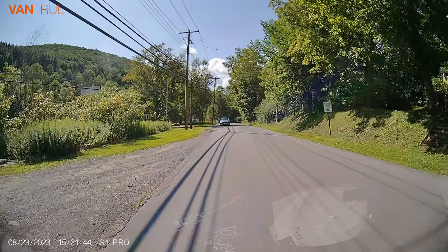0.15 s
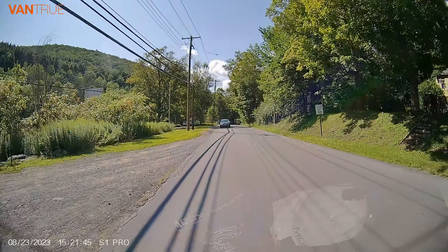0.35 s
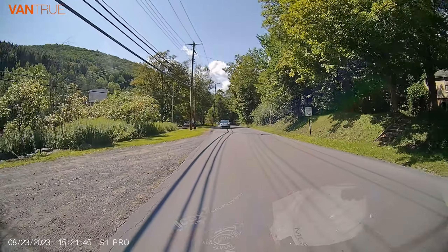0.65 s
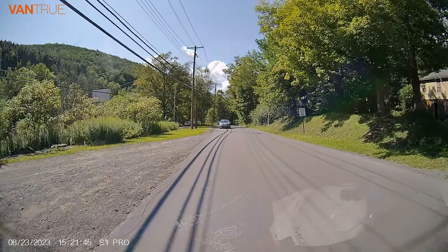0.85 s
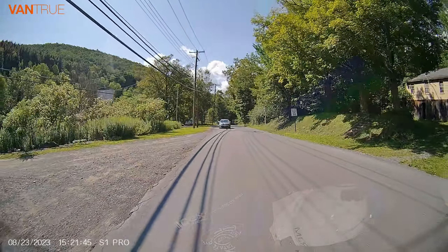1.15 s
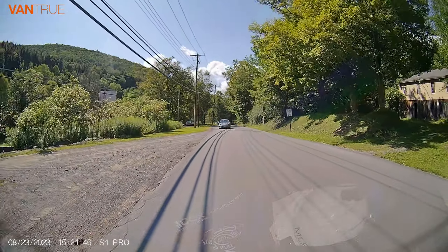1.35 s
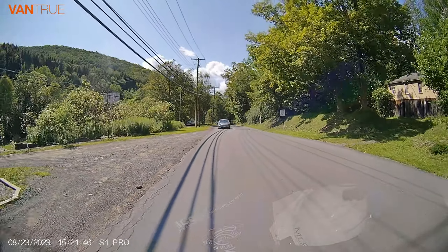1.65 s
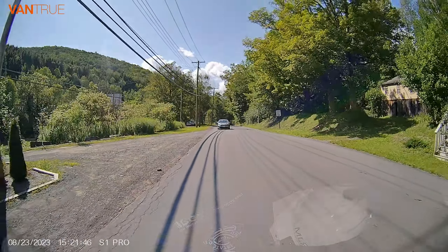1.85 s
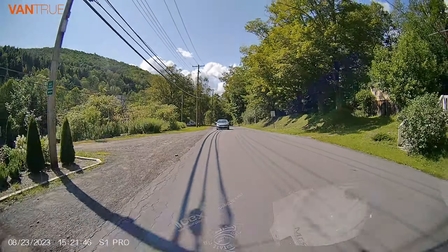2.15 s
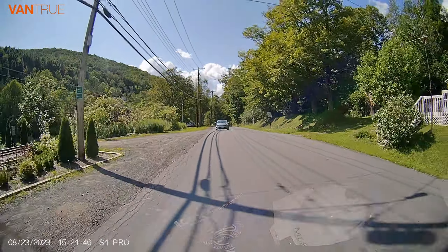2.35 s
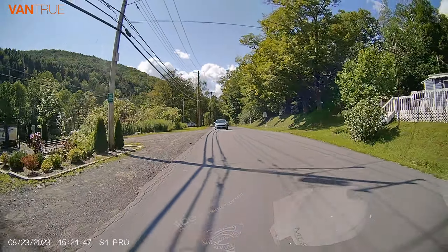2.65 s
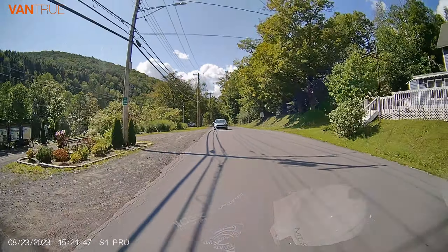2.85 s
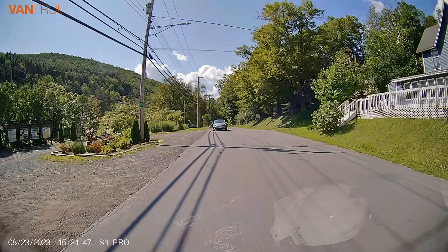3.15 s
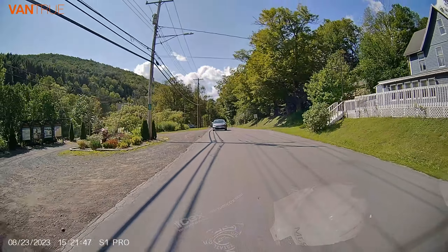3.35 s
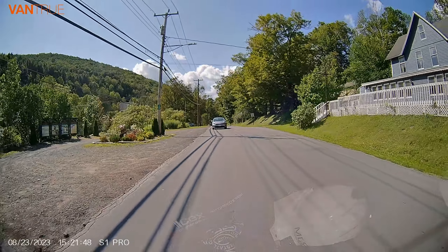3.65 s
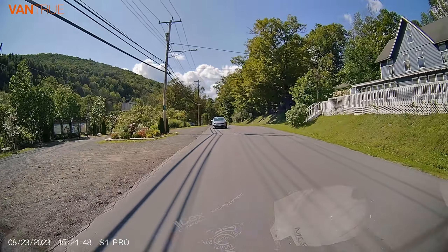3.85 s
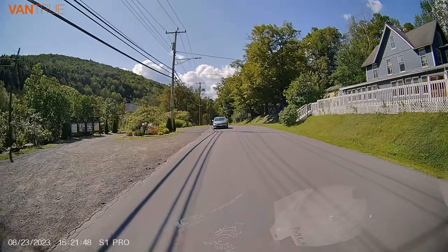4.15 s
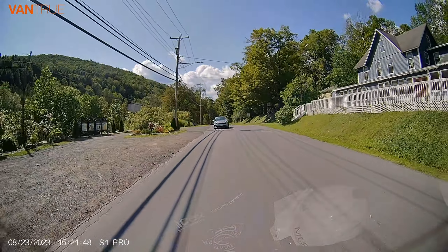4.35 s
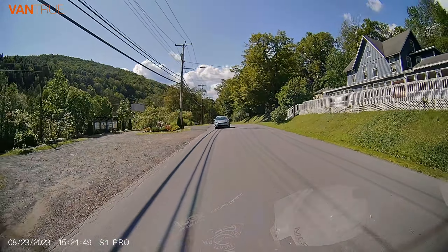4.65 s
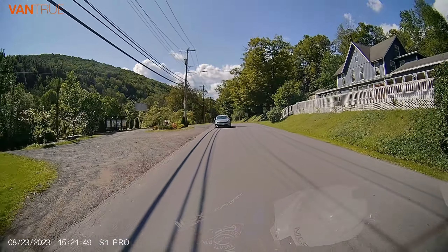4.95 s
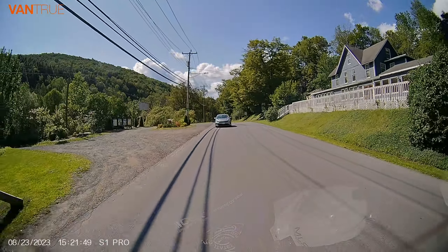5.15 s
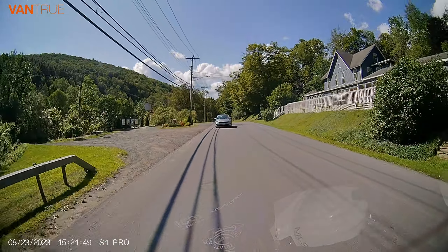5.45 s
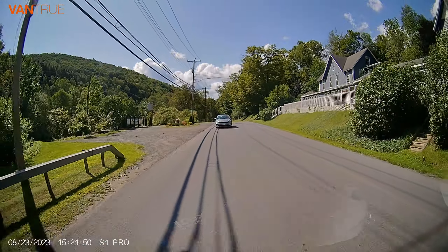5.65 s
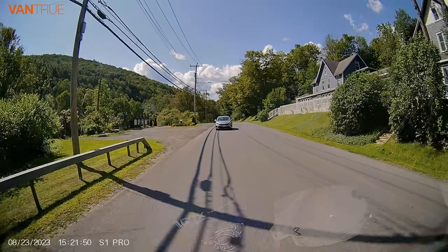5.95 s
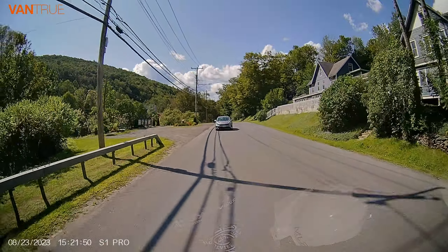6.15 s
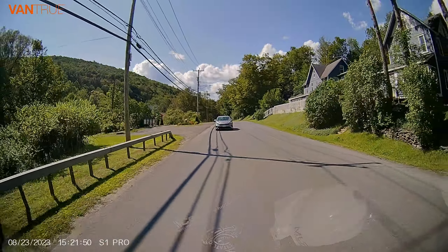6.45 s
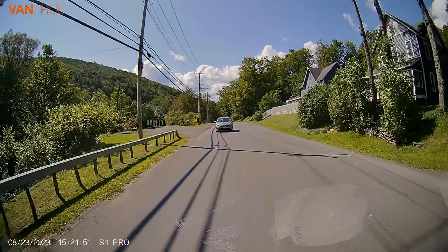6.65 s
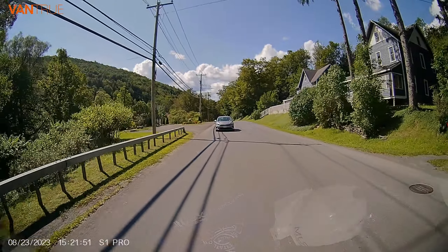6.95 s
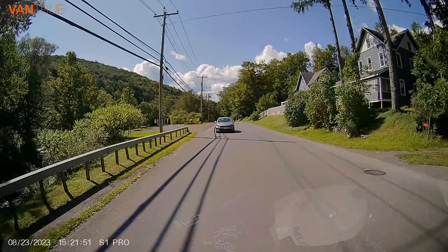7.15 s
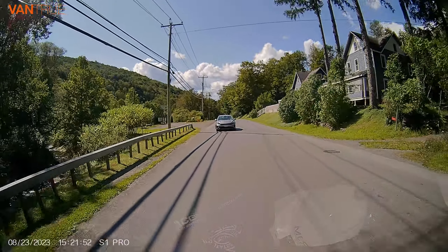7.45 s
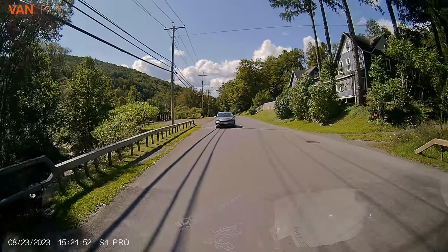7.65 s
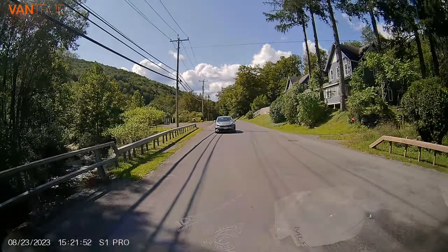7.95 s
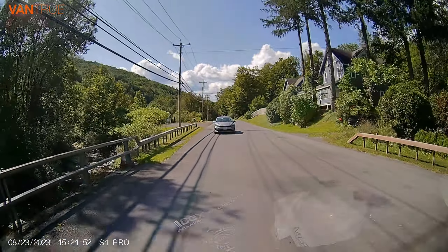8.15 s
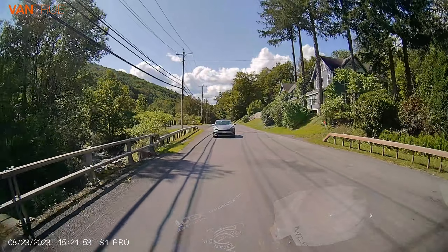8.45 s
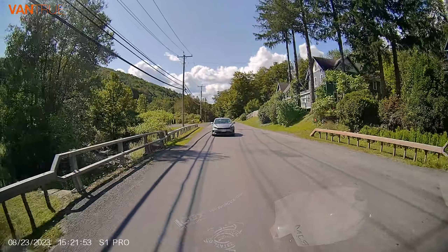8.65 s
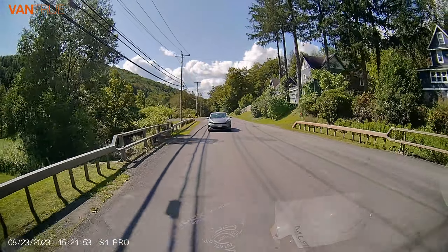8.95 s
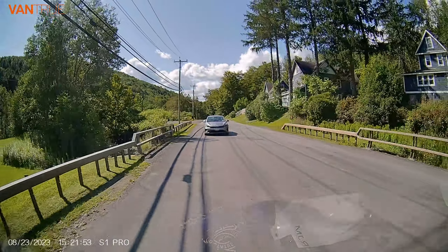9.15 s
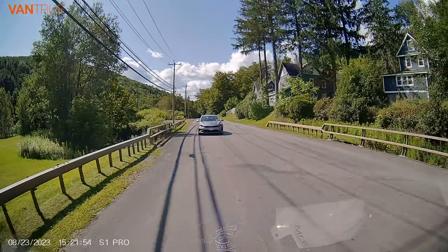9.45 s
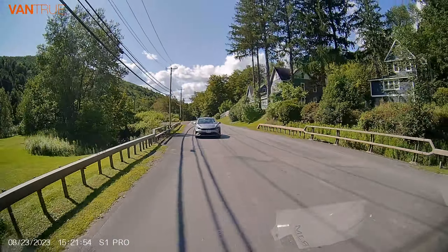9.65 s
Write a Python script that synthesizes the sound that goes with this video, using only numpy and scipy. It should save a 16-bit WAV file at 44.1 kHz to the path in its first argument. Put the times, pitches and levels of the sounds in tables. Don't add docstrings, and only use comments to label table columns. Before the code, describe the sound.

Heard inside a moving car through one small, dull microphone, left channel only. A four-cylinder engine pulls steadily higher over deep road rumble and faint air hiss, with light plastic ticks. At about four and a half seconds a hard knock lands, the pedal is released and the engine sinks away. Then a rough bridge brings dense thumps, knocks and rattles, easing into quiet coasting.

```python
import sys
import numpy as np
from scipy import signal
from scipy.io import wavfile
from scipy.ndimage import uniform_filter1d

SR = 44100
rng = np.random.default_rng(int(sys.argv[2]) if len(sys.argv) > 2 else 0)


def put_to_file(sound):
    columns = np.atleast_2d(sound).T
    safe = np.clip(columns, -1, 1)
    whole_steps = np.round(safe * 32767)
    wavfile.write(sys.argv[1], SR, whole_steps.astype(np.int16))


N = 432621


def undb(db):
    return 10 ** (np.asarray(db) / 20)


def rms_one(x):
    return x / np.sqrt(np.mean(x ** 2) + 1e-20)


def in_time(points, step=1):
    s, values = np.transpose(points)
    return np.interp(np.arange(0, N, step) / SR, s, values)


def at_hz(points, hz):
    pitches, levels = np.transpose(points)
    return np.interp(np.log(hz), np.log(pitches), levels)


def band_pass(x, low_hz, high_hz, order=2):
    return signal.sosfilt(signal.butter(order, [low_hz, high_hz], "band", fs=SR, output="sos"), x)


def low_pass(x, hz, order=2):
    return signal.sosfilt(signal.butter(order, hz, fs=SR, output="sos"), x)


def cut_above(x, hz):
    return signal.sosfilt(signal.ellip(10, .5, 60, hz, fs=SR, output="sos"), x)


def drift(rate):
    r = np.exp(-128 * np.pi * rate / SR)
    coarse = rng.standard_normal(N // 64 + 1002)
    slow = signal.lfilter([1], [1, -2 * r, r * r], coarse)[1000:]
    return np.interp(np.arange(N) / 64, np.arange(len(slow)), rms_one(slow))


def ring(clicks, hz, t60):
    r = undb(-60 / (max(t60, .004) * SR))
    w = 2 * np.pi * hz / SR
    return signal.lfilter([0, np.sin(w)], [1, -2 * r * np.cos(w), r * r], clicks + 1e-18)


def add(out, s, sound):
    i = max(round(s * SR), 0)
    out[i:i + len(sound)] += sound[:N - i]


def noise_bands(spectrum, low_hz, high_hz, patchy_db):
    count = max(round(3 * np.log2(high_hz / low_hz)), 1)
    edges = np.geomspace(low_hz, high_hz, count + 1)
    white = rng.standard_normal((2, N))
    together, out = drift(6.4), 0
    for k, (low, high) in enumerate(zip(edges, edges[1:])):
        flicker_db = patchy_db * (2.0 * together + drift(6.8))
        level_db = at_hz(spectrum, np.sqrt(low * high)) + flicker_db
        out = out + band_pass(white[k % 2], low, high) * undb(level_db)
    return rms_one(out)


LIFT_OFF_S = 4.6


def coasting(step=1):
    return np.clip((np.arange(0, N, step) / SR - LIFT_OFF_S) / .3, 0, 1)


# (pitch [Hz], width
# [Hz], level [dB])
CABIN_RESONANCES = [(84, 4.4, 4.5), (171, 48, 9.5), (246, 29, 5.5), (299, 45, 7.5), (237, 12, -5.5),
                    (278, 12, -8.5), (600, 30, 6), (816, 34, 10), (960, 90, 10), (1244, 23, 7),
                    (1263, 30, 6.5), (1402, 28, 12.5), (1545, 68, 15), (1918, 53, 9)]


def resonance_db(hz):
    return sum(db / (1 + (2 * (hz - centre) / width) ** 2) for centre, width, db in CABIN_RESONANCES)


# (pitch [Hz], level [dB])
FIREWALL = [(15, -10.5), (60, -23), (150, -16.5), (300, -14), (500, -15.5), (900, -33.5), (1500, -29),
            (1620, -40), (1700, -45), (2300, -41)]


def cabin_db(hz):
    return at_hz(FIREWALL, hz) + resonance_db(hz)


# (time [s], level [dB])
ENGINE_LOAD = [(0, -57.5), (.7, -53), (1, -54.5), (1.5, -52.5), (2, -53), (2.7, -49.5), (3.1, -50.5),
               (3.5, -49), (4.5, -47.5), (4.75, -54.5), (5.8, -66.5), (6.3, -94), (9.81, -89)]
WHINE_ORDER, WHINE_DB, WHINE_DB_PER_HZ, WHINE_COASTING_DB, WHINE_DIES_HZ = 32, -81, .9, -4, 62


def pump_whine(firing_hz, phase, off, wander):
    speed_up_hz = np.maximum.accumulate(firing_hz) - ENGINE_SPEED[0][1]
    level_db = WHINE_DB + WHINE_DB_PER_HZ * speed_up_hz + WHINE_COASTING_DB * off
    level_db = level_db - 5.1 * np.maximum(WHINE_DIES_HZ - firing_hz, 0) - 4.5 + 2.5 * wander
    return undb(level_db) * np.sin(WHINE_ORDER * phase)


# (pitch [Hz], level [dB])
CABIN_BOOM = [(55, -82), (62, -46), (70, -74.5), (74, -46.5), (79, -46), (84, -37.5), (88.5, -56),
              (92, -53.5)]
# (pitch [Hz], level [dB])
EXHAUST_DRONE = [(140, -72), (150, -54.5), (160, -60), (163, -47.5), (172, -50.5), (178, -43.5), (184, -56)]
BOOM_COASTING_DB, DRONE_COASTING_DB = -4, -15.0


def boom_and_drone(firing_hz, phase, off):
    boom_db = at_hz(CABIN_BOOM, firing_hz) + 3.0 + BOOM_COASTING_DB * off
    drone_db = at_hz(EXHAUST_DRONE, 2 * firing_hz) + 3.0 + DRONE_COASTING_DB * off
    return undb(boom_db) * np.sin(4 * phase) + undb(drone_db) * np.sin(8 * phase)


# (time [s], firing rate [Hz])
ENGINE_SPEED = [(0, 67.0), (1, 72.5), (2, 78.4), (3, 84.1), (3.8, 89.0), (4.4, 91.3), (4.75, 91.8),
                (5.0, 86.3), (5.2, 81.0), (5.45, 75.0), (5.75, 62.0), (6.6, 55.0), (9.81, 55.0)]
ORDER_OFFSETS = {1: -11.5, 2: -9, 3: -8, 4: -16, 5: -15.5, 6: -7, 7: -0.5, 8: -8.5, 10: 2.8, 11: 1.6, 12:
                 0.82, 14: 3, 16: -4.5, 20: -1.8, 24: -2.5, 26: -2.5, 28: 1.4, 40: -5.5, 42: -2.1}
VALVE_ORDERS = {76: 0, 84: -5, 88: 4, 92: 5, 104: 5}
# (pitch [Hz], level [dB])
DASH_WHISTLE = [(1485, -90), (1508, -72), (1548, -66), (1557, -66), (1563, -90)]
WHISTLING_ORDERS = {70: -4, 72: -2, 76: 0, 84: -5, 88: -2}
ORDER_SWELLS = {11: [(4.4, -10)], 15: [(2.8, 6)], 16: [(.35, 12), (1.3, 11.5), (3.2, 9)], 18: [(1.1, 3)],
                19: [(2.1, 11.5), (3.95, 6.5)], 57: [(4.55, 7)], 58: [(4.5, 10.5)], 62: [(1.8, 10),
                (3.1, 7)], 66: [(2.2, 7.5)], 68: [(2.3, 8)], 70: [(3.8, 0)], 74: [(2.75, 6.5)],
                76: [(2.4, 5)], 88: [(.6, 5), (3.5, 5)], 92: [(2.85, 4), (3.6, -10)], 104: [(1.1, 5)]}
SWELL_S = .22
ODD_DB, EVEN_DB, FIRING_DB = -3, -0.5, 2
CLATTER_FROM_ORDER, CLATTER_DB, CLATTER_COASTING_DB = 50, -3, 8
SING_FROM_DB, SING_FULL_DB = 5, 11
CRANK_WOBBLE_RAD = .010


def engine(waver_db):
    step, slow = 6, 32
    size = round(6.6 * SR) // step
    firing_hz = in_time(ENGINE_SPEED, step)[:size]
    off = coasting(step)[:size]
    cycle_hz = firing_hz / 4
    phase = 2 * np.pi * np.cumsum(cycle_hz) * step / SR
    whine_wander = drift(4)[:size * step:step]
    phase = phase + CRANK_WOBBLE_RAD * drift(6)[:size * step:step]
    out = pump_whine(firing_hz, phase, off, whine_wander) + boom_and_drone(firing_hz, phase, off)

    slow_at = np.arange(0, size, slow)
    t, off = slow_at * step / SR, off[::slow]
    load_db = in_time(ENGINE_LOAD, step)[:size:slow]
    clatter_db = load_db + CLATTER_DB + CLATTER_COASTING_DB * off
    for k in range(1, 105):
        hz = k * cycle_hz[::slow]
        uneven = np.interp(slow_at, np.linspace(0, size, 30), rng.standard_normal(30))
        sings = np.clip((resonance_db(hz) - SING_FROM_DB) / (SING_FULL_DB - SING_FROM_DB), 0, 1)
        family_db = ODD_DB if k % 2 else EVEN_DB if k % 4 else FIRING_DB
        valve_db = VALVE_ORDERS.get(k, 0) * (1 - off) * sings
        drive_db = load_db if k < CLATTER_FROM_ORDER else clatter_db
        order_db = ORDER_OFFSETS.get(k, 0) + valve_db + family_db
        level_db = drive_db + cabin_db(hz) + order_db + waver_db * uneven
        whistle_db = at_hz(DASH_WHISTLE, hz) + WHISTLING_ORDERS.get(k, -60) - 3.0 - 20 * off
        swell_db = sum(db * np.exp(-((t - s) / SWELL_S) ** 2) for s, db in ORDER_SWELLS.get(k, []))
        gain = (undb(level_db) + undb(whistle_db)) * undb(swell_db)
        tone = np.sin(k * phase + rng.uniform(0, 2 * np.pi))
        out = out + np.repeat(gain, slow)[:size] * tone
    full = np.zeros(N)
    full[:size * step] = signal.resample_poly(out, step, 1)
    return full


# (pitch [Hz], level [dB per Hz])
HISS_COLOUR = [(1500, 5.5), (1800, 4.5), (2300, -2), (2600, -1), (3500, -4), (3900, -5.5), (5000, -6.5),
               (7500, -9), (9000, -12.5)]
HISS_DB = -76.5


def air_hiss():
    hiss = undb(HISS_DB) * noise_bands(HISS_COLOUR, 1445, 9000, patchy_db=.15)
    intake = band_pass(hiss, 2300, 3900)
    return hiss + undb(in_time(ENGINE_LOAD) + 41) * intake


# (time [s], level [dB])
ROAD_SHAKE = [(0.0, -43), (0.11, -56), (1.61, -46.5), (5.03, -53.5), (5.08, -52), (5.19, -47),
              (7.07, -53.5), (7.21, -44), (7.38, -51), (7.49, -30.5), (7.76, -37.5), (8.8, -34.5),
              (8.83, -36.5), (8.88, -40.5), (9.21, -40.5), (9.26, -47.5), (9.45, -43), (9.81, -49.5)]
ROAD_EDGES_HZ = (55, 130, 500, 1650)
# (pitch [Hz], level [dB per Hz])
ROAD_COLOUR = [(11, -32), (18, 1.5), (43, 10), (65, -3.5), (98, 0.5), (129, -17), (199, -16.5), (233, -20),
               (263, -20), (320, -19), (422, -33.5), (465, -25), (494, -29), (534, -28), (2000, -41.5),
               (2600, -74), (4400, -120)]
SMOOTH_DB = -50
TYRE_BOOM_DB, TYRE_BOOM_FOLLOWS, TYRE_BOOM_LINGERS_S, TYRE_BOOM_KICK_DB = -49, 0.3, 0.037, -20.5
RUMBLE_DB, RUMBLE_FOLLOWS, RUMBLE_KICK_DB = -52.5, 0.11, -2.5
ROAR_DB, ROAR_FOLLOWS, ROAR_GAIN_DB_PER_S, ROAR_LOSS_DB_PER_S = -62, 0.24, 0.8, 0.73


def road():
    shake_db, t = in_time(ROAD_SHAKE), np.arange(N) / SR
    rough_db = shake_db - SMOOTH_DB
    s, db, *_ = np.transpose(WHEEL_BUMPS)
    blows = np.bincount((s * SR).astype(int), undb(db + TYRE_BOOM_KICK_DB), N)
    kicks = signal.lfilter([1], [1, -np.exp(-1 / (TYRE_BOOM_LINGERS_S * SR))], blows + 1e-18)
    kicks = uniform_filter1d(kicks, size=900)
    before_s, after_s = np.maximum(LIFT_OFF_S - t, 0), np.maximum(t - LIFT_OFF_S, 0)
    slow_db = ROAR_GAIN_DB_PER_S * before_s + ROAR_LOSS_DB_PER_S * after_s

    a, b, c, d = ROAD_EDGES_HZ
    body = rms_one(ring(rng.standard_normal(N), 30.5, .55))
    shake = undb(shake_db) * rms_one(noise_bands(ROAD_COLOUR, 21, a, patchy_db=2.5) + 1.7 * body)
    boom_gain = undb(TYRE_BOOM_DB + TYRE_BOOM_FOLLOWS * rough_db) + kicks
    boom = boom_gain * noise_bands(ROAD_COLOUR, a, b, patchy_db=-1.8)
    rumble_gain = undb(RUMBLE_DB + RUMBLE_FOLLOWS * rough_db) + undb(RUMBLE_KICK_DB) * kicks
    rumble = rumble_gain * noise_bands(ROAD_COLOUR, b, c, patchy_db=.9)
    roar_gain = undb(ROAR_DB + ROAR_FOLLOWS * rough_db - slow_db)
    roar = roar_gain * cut_above(noise_bands(ROAD_COLOUR, c, d, patchy_db=.9), d)
    return shake + boom + rumble + roar


# (time [s], level [dB], pitch [Hz], length [s])
PANEL_BUZZES = [(3.9, -65.5, 1290, 0.132), (4.562, -62, 1400, 0.14), (4.563, -62, 1035, 0.067),
                (7.487, -64.5, 1500, 0.063), (7.505, -73, 2140, 0.03), (7.555, -74, 2300, 0.013),
                (7.515, -80, 3600, 0.024), (9.2, -61, 950, 0.021), (8.495, -66, 2850, 0.014),
                (7.8, -60, 1110, .008), (8.66, -57, 820, 0.017), (8.105, -58, 1000, .015),
                (8.15, -58, 850, .025), (8.285, -63, 970, .02), (8.45, -55.5, 1000, .025),
                (8.76, -61, 1030, 0.11), (6.57, -60, 520, .06), (6.57, -70, 1420, .03),
                (3.8, -64, 1100, .05), (8.94, -66, 950, 0.12)]
BUZZ_CYCLES = 29
DOOR_HZ, DOOR_T60_S, DOOR_DB = 322.7, .07, -57.5


def panels():
    hum = rms_one(ring(rng.standard_normal(N), DOOR_HZ, DOOR_T60_S))
    out = undb(DOOR_DB + 1.9 * drift(2.7)) * hum
    t = np.arange(12000) / SR
    for s, db, hz, length in PANEL_BUZZES:
        buzz = rms_one(ring(rng.standard_normal(12000), hz, BUZZ_CYCLES / hz))
        shape = np.clip(t / .006, 0, 1) * np.exp(-np.maximum(t - length, 0) / 0.019)
        add(out, s, undb(db) * shape * buzz)
    return out


# (first touch [s], last touch [s], taps per body swing, peak level [dB])
TAP_RUNS = [(.7452, .7796, 1, -69.5), (1.9629, 2.0018, 1, -65), (2.2822, 2.3937, 1, -64.5),
            (2.491, 2.5272, 1, -64.5), (2.7247, 2.8325, 1, -64), (2.9612, 2.9612, 1, -65),
            (3.7308, 3.7678, 1, -63), (4.0302, 4.0991, 1, -62.5), (4.6064, 4.6064, 1, -67),
            (4.694, 4.7686, 1, -62.5), (5.3926, 5.4271, 1, -65), (6.0866, 6.137, 1, -64),
            (6.1709, 6.1888, 2, -64.5), (7.0958, 7.1467, 2, -62.5), (7.2085, 7.2085, 1, -64),
            (6.6393, 6.657, 2, -62.5), (3.272, 3.307, 1, -65), (7.4001, 7.436, 1, -65.5),
            (7.5677, 7.5677, 1, -64), (7.7243, 7.7243, 1, -64), (7.8356, 7.9708, 1, -64.5),
            (8.0477, 8.0477, 1, -63.5), (8.1743, 8.1743, 1, -61), (8.2985, 8.3539, 1, -63),
            (8.3903, 8.4432, 2, -61.5), (8.6068, 8.679, 1, -60.5), (8.909, 8.93, 2, -59.5),
            (9.0309, 9.0838, 1, -67), (9.208, 9.2993, 1, -63.5), (9.4898, 9.5786, 2, -65)]
SWING_S = .035
TAP_HZ, TAP_SPREAD_HZ, TAP_SPREAD_DB = 3280, 130, 1.5


def taps():
    rows = []
    for first, last, per_swing, db in TAP_RUNS:
        count = round((last - first) * round(per_swing) / SWING_S) + 1
        for s in np.linspace(first, last, count):
            a, b = rng.standard_normal(2)
            rows.append((s, db + TAP_SPREAD_DB * a, TAP_HZ + TAP_SPREAD_HZ * b))
    return rows


# (time [s], peak level [dB], main pitch [Hz])
HARD_TICKS = [(1.4785, -66, 3170), (2.4543, -64, 3080), (2.9274, -57.5, 2820), (3.3997, -62, 2820),
              (3.4915, -63, 3260), (3.6167, -64.5, 3410), (4.155, -60, 2950), (5.5053, -56, 3180),
              (7.045, -63, 3240), (7.4728, -52, 3320), (7.491, -50, 3400), (7.5083, -53.5, 3430),
              (7.5864, -56, 3420), (7.756, -50.5, 2780), (8.0013, -52.5, 2920), (8.0235, -57, 3430),
              (8.116, -59, 3300), (8.2038, -55, 3300), (8.2227, -54.5, 2900), (8.464, -55, 2950),
              (8.483, -55.5, 2830), (8.538, -41, 2900), (8.543, -52, 3500), (8.5643, -48.5, 3260),
              (8.7071, -55, 3170), (8.73, -49, 2890), (8.7675, -52.5, 3350), (9.128, -57, 3420),
              (9.157, -53, 2840), (9.3555, -61, 2930)]
# (pitch [Hz], level [dB], time to fall 60 dB [s])
PLASTIC_MODES = [(2360, -5.5, 0.012), (2980, -14.5, 0.048), (3320, -8, 0.0091), (3300, -9.5, 0.0056)]


def ticks():
    out, click = np.zeros(N), np.zeros(2000)
    click[0], click[90] = 1, -0.046
    soft_start = 1 - np.exp(-np.arange(2000) / SR / .0007)
    for s, db, main_hz in [*HARD_TICKS, *taps()]:
        tick = ring(click, main_hz, 0.0059 + 0.0017 * np.clip(db + 55.0, 0, 9.0))
        for hz, mode_db, t60 in PLASTIC_MODES:
            tick = tick + undb(mode_db + rng.normal(-1.5, 2.0)) * ring(click, hz, t60)
        tick = tick * soft_start
        add(out, s, undb(db - 0.5) * tick / np.abs(tick).max())
    shaken = undb(0.67 * (in_time(ROAD_SHAKE) + 48.0))
    chatter = (rng.random(N) < 12 * shaken / SR) * undb(-71.5 + rng.normal(0, 2.0, N))
    out += ring(chatter, 3350, 0.014) + 0.4 * ring(chatter, 2900, 0.0055)
    return band_pass(out, 2100, 4000, order=3)


# (time [s], level [dB], length [s], centre pitch [Hz])
RUBBING_SCUFFS = [(0.296, -79.5, 0.029, 6000), (0.36, -72, 0.013, 4500), (5.09, -74.5, 0.022, 3970),
                  (5.508, -76, 0.021, 3020), (5.512, -60.5, 0.018, 1280), (6.117, -80, .03, 5040),
                  (6.931, -71, 0.0057, 4020), (7.527, -76.5, 0.072, 2100), (7.501, -73.5, .03, 3380),
                  (7.775, -68.5, 0.016, 3200), (8.487, -67.5, 0.032, 2880), (9.319, -66.5, 0.014, 2830),
                  (4.551, -69, 0.012, 2800), (8.228, -75, 0.008, 5000), (8.743, -57.5, 0.017, 2500),
                  (8.744, -58.5, 0.0054, 5600), (8.575, -75, 0.024, 5360), (8.767, -68.5, 0.017, 3170),
                  (9.132, -73, 0.0084, 5030), (9.16, -76, 0.0072, 5000), (9.728, -77, .012, 4000)]


def scuffs():
    out, t = np.zeros(N), (np.arange(8000) - 4000) / SR
    for s, db, length, hz in RUBBING_SCUFFS:
        white = rng.standard_normal(8000)
        grains = white * (np.abs(white) > 2.4)
        puff = rms_one(band_pass(grains, 0.38 * hz, 1.19 * hz))
        side_s = length * np.where(t < 0, .6, 1.3)
        add(out, s - 4000 / SR, undb(db) * puff * np.exp(-(t / side_s) ** 2))
    return out


# (time [s], peak level [dB], main pitch [Hz], brightness [dB])
TRIM_KNOCKS = [(0.381, -45, 1260, -4), (2.063, -36, 560, -21), (4.536, -26.5, 780, -13.5),
               (5.246, -30, 790, -19), (5.505, -34.5, 670, -22.5), (6.556, -34.5, 532, -15),
               (6.93, -49, 980, 7), (7.185, -36, 670, -43), (7.447, -34.5, 850, -14),
               (7.471, -37, 1340, -8.5), (7.489, -40, 876, 0.5), (7.509, -36, 651, -42),
               (7.608, -48, 830, -12), (7.689, -48, 991, -11), (7.951, -42.5, 1040, -13),
               (8.116, -43.5, 835, -16), (8.147, -35, 500, -14.5), (8.285, -48, 695, -2),
               (8.393, -45.5, 650, -9), (8.411, -32.5, 996, -14.5), (8.493, -34.5, 996, -17),
               (8.539, -36, 680, -11), (8.573, -33, 654, -12.5), (8.646, -39, 840, -13),
               (8.747, -38, 664, -5), (8.936, -36.5, 624, -9), (9.306, -35, 1074, -11.5),
               (9.726, -35, 647, -20)]
# (pitch [Hz], level [dB], time to fall 60 dB [s])
TRIM_MODES = [(197, 0, 0.06), (336.3, -3, 0.2), (404, -17, 0.21), (484, 1, 0.031), (601, -9.5, 0.17),
              (770, -22.5, 0.011), (970, -2.5, 0.023), (1160, 3, 0.0048), (1195, -11, 0.035),
              (1495, -13, 0.021)]
KNOCK_S = .016


def knocks():
    out, size = np.zeros(N), round(.25 * SR)
    t = np.arange(size) / SR
    contacts = (np.array([0, .3, .6, 1]) * KNOCK_S * SR).astype(int)
    for s, db, main_hz, bright_db in TRIM_KNOCKS:
        luck, hit = rng.random(50), 0
        for k, (hz, mode_db, t60) in enumerate([*TRIM_MODES, (main_hz, -3.0, .05)]):
            strength = (0.15 + luck[4 * k:4 + 4 * k]) * [0.7, 0.76, 0.33, 0.21]
            clicks = np.zeros(size)
            clicks[contacts] = strength * np.sign(luck[k:k + 4] - .5)
            tilt_db = (bright_db + 16.5) * np.log2(hz / 500)
            mode = ring(clicks, hz, t60)
            level_db = mode_db + 0.93 * tilt_db + 1.1 * luck[k + 30]
            hit = hit + undb(level_db) * mode / np.abs(mode).max()
        shudder = rms_one(band_pass(rng.standard_normal(size), 200, 900))
        shudder = shudder * (1 - np.exp(-t / 0.0029)) * undb(-60 * t / 0.13)
        hit = hit / np.abs(hit).max() + 0.2 * shudder
        hit = low_pass(hit, 1900 * undb(0.27 * bright_db), order=3) * (1 - np.exp(-t / 0.0025))
        add(out, s, undb(db - 3.5) * hit / np.abs(hit).max())
    return out


def thumps(rows, floor_db, cut_hz=600):
    out, t = np.zeros(N), np.arange(round(.4 * SR)) / SR
    for s, db, hz, t60 in rows:
        floor_hz, turn = 125 + 8.0 * rng.uniform(0, 2 * np.pi), rng.uniform(0, 2 * np.pi)
        shape = (1 - np.exp(-t / 0.003)) ** 2 * undb(-60 * t / max(t60, .03))
        floor = undb(floor_db) * np.sin(2 * np.pi * floor_hz * t + turn)
        body = floor - np.sin(2 * np.pi * hz * t)
        add(out, s, undb(db + 0.5) * shape / shape.max() * body)
    return low_pass(out, cut_hz)


# (time [s], peak level [dB], body pitch [Hz], time to fall 60 dB [s])
WHEEL_BUMPS = [(0.75, -34.5, 104.4, 0.28), (4.506, -43, 94, 0.23), (4.532, -27.5, 196, 0.067),
               (4.557, -35.5, 90.5, 0.35), (5.229, -33, 147, 0.13), (5.248, -35, 75.4, 0.36),
               (5.27, -35, 108, 0.2), (6.415, -37.5, 98, 0.16), (6.872, -35.5, 98, 0.13),
               (6.922, -29, 116, 0.065), (7.155, -38, 101.2, 0.33), (7.188, -29.5, 162, 0.053),
               (7.208, -33, 92, 0.36), (7.426, -35, 122, 0.24), (7.449, -22, 85.3, 0.13),
               (7.468, -31, 161.5, 0.12), (7.501, -35.3, 74, 0.24), (7.535, -42, 154, 0.32),
               (7.562, -37, 104.7, 0.32), (7.629, -32.5, 91.7, 0.41), (7.701, -38, 103, 0.3),
               (7.783, -25.5, 99, 0.048), (7.831, -37, 94.6, 0.26), (7.942, -35, 61.5, 0.2),
               (7.99, -33.5, 180, 0.045), (8.079, -39.5, 124, 0.12), (8.098, -33, 141.7, 0.35),
               (8.127, -18, 111, 0.049), (8.179, -29, 97.6, 0.075), (8.255, -34, 111.6, 0.3),
               (8.28, -24.5, 86, 0.092), (8.338, -48, 71, 0.26), (8.365, -31, 170.2, 0.46),
               (8.384, -23, 77.7, 0.16), (8.41, -23, 117.7, 0.17), (8.436, -30, 66.4, 0.16),
               (8.459, -34, 92.6, 0.079), (8.49, -19, 97.6, 0.067), (8.65, -29, 87.3, 0.34),
               (8.699, -36, 101, 0.058), (8.72, -40, 145.6, 0.29), (8.744, -28.5, 83.5, 0.16),
               (8.765, -33.5, 161, 0.2), (8.801, -34, 101, 0.093)]


def wheel_bumps():
    return thumps(WHEEL_BUMPS, floor_db=-15)


# (time [s], peak level [dB], pitch [Hz], time to fall 60 dB [s])
LOW_THUMPS = [(2.695, -24, 74, 0.13), (4.207, -38, 104.8, 0.56), (4.915, -34, 89.5, 0.16),
              (5.038, -33, 86.5, 0.68), (5.081, -27, 80.7, 0.16), (5.145, -28, 92, 0.22),
              (5.49, -41, 177.4, 0.2), (6.565, -37.5, 206, 0.25), (9.6, -39, 96.8, 0.19),
              (9.74, -38.5, 104.6, 0.23)]


def low_thumps():
    return thumps(LOW_THUMPS, floor_db=-28)


# (time [s], peak level [dB], pitch [Hz], time to fall 60 dB [s])
PANEL_HITS = [(4.5224, -44, 332, 0.08), (4.5329, -28.2, 386, 0.084), (4.5359, -30, 481, 0.046),
              (4.536, -33, 770, 0.066), (4.5386, -46, 1316, 0.035), (4.5394, -51, 985, 0.03),
              (4.5416, -27.5, 544, 0.03), (4.544, -35, 322, 0.08), (4.5459, -41, 610, 0.03),
              (4.5559, -40, 424, 0.03), (4.5657, -41, 370, 0.05), (4.577, -43, 439, 0.05),
              (5.2484, -40.5, 572, 0.08), (5.2508, -47, 740, 0.074), (5.2511, -38, 316, 0.08),
              (5.2576, -39.5, 478, 0.04), (5.2813, -42, 323, 0.15), (6.5927, -33, 285, 0.026),
              (7.1757, -40, 312, 0.09), (7.4508, -29, 251, 0.03), (7.4543, -40.5, 325, 0.14),
              (7.4724, -36, 261, 0.05), (7.511, -40.5, 297, 0.043), (8.1206, -33.5, 250, 0.028),
              (8.123, -47.5, 418, 0.17), (8.1306, -39.6, 285, 0.03), (8.1603, -40, 326, 0.026),
              (8.1816, -39, 341, 0.045), (8.3879, -40.5, 307, 0.072), (8.4017, -43.5, 255, 0.13),
              (8.411, -40, 387, 0.041), (8.4138, -45.7, 936, 0.033), (8.4163, -50.5, 655, 0.13),
              (8.484, -37.5, 280, 0.03), (8.4903, -47, 660, 0.08), (8.4921, -39, 388, 0.034),
              (8.4937, -40.5, 247, 0.13), (8.5438, -40.9, 270, 0.025), (8.5734, -53, 990, 0.018),
              (8.5724, -42, 500, 0.03), (8.937, -41, 499, 0.026), (9.3057, -45.5, 650, 0.041),
              (9.3073, -43.5, 458, 0.034), (9.3097, -50, 983, 0.06)]


def panel_hits():
    return thumps(PANEL_HITS, floor_db=-60, cut_hz=4000)


def scene():
    cabin = engine(waver_db=3.0) + air_hiss() + road() + panels() + ticks()
    cabin += scuffs() + knocks() + wheel_bumps() + low_thumps() + panel_hits()
    return np.stack([2 * cabin, np.zeros(N)])


# (start time [s], end time [s])
STARVED_MOMENTS = [(4.495, 4.555), (6.543, 6.605), (7.440, 7.499), (8.271, 8.395), (8.911, 8.971),
                   (9.295, 9.355)]
STARVED_ABOVE_HZ, CUTOFF_HZ = 4500, 7620


def record(dry):
    wide, narrow = cut_above(dry, CUTOFF_HZ), cut_above(dry, STARVED_ABOVE_HZ)
    t = np.arange(N) / SR
    starved = sum(1. * ((t > a) & (t < b)) for a, b in STARVED_MOMENTS)
    starved = uniform_filter1d(starved, size=200)
    return np.round((wide + starved * (narrow - wide)) * 2 ** 15) / 2 ** 15


dry = scene()
out = record(dry)
put_to_file(out)
```